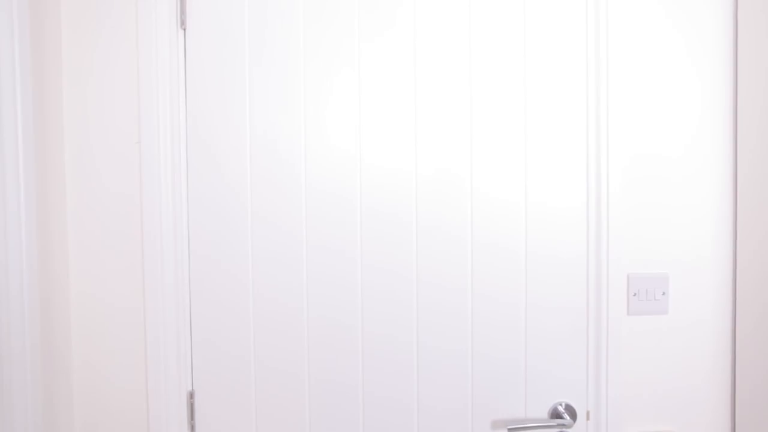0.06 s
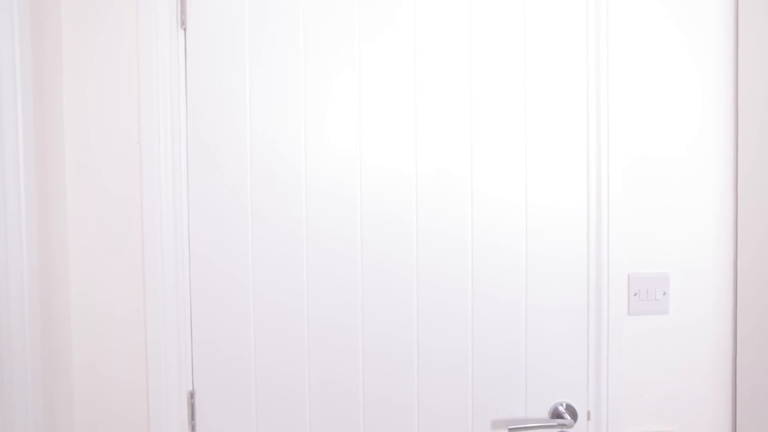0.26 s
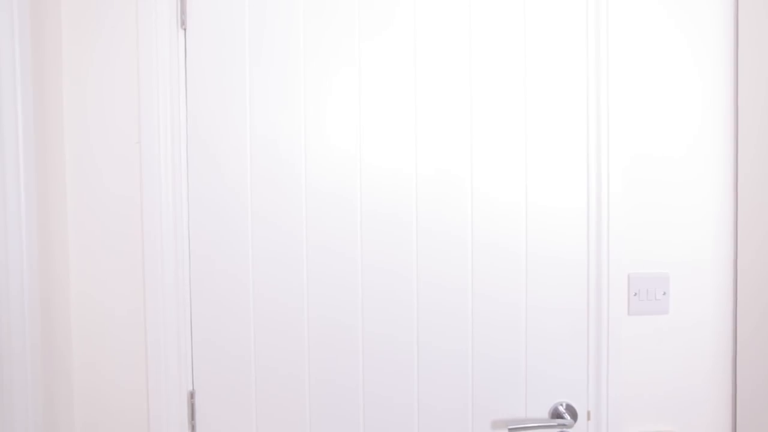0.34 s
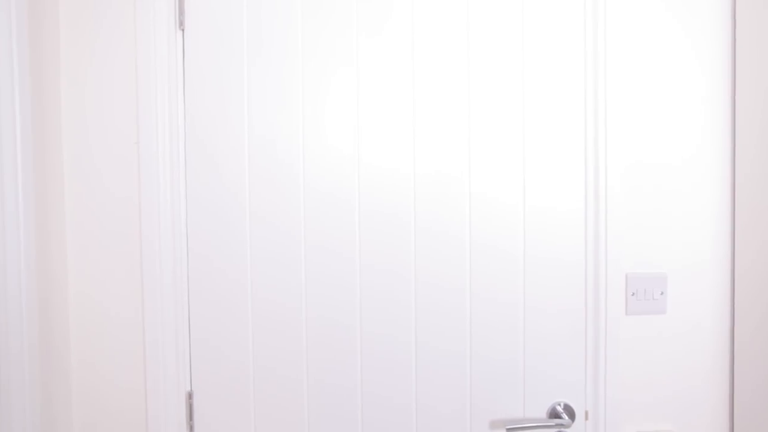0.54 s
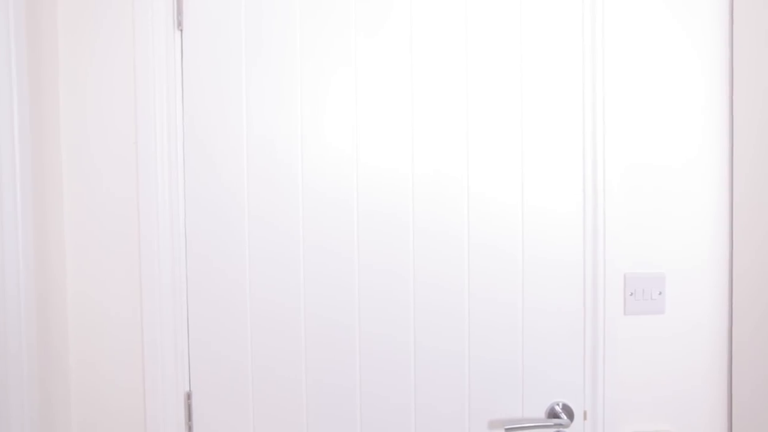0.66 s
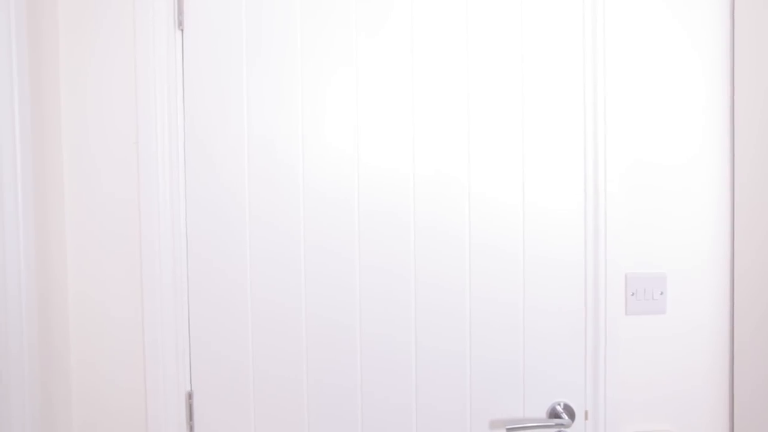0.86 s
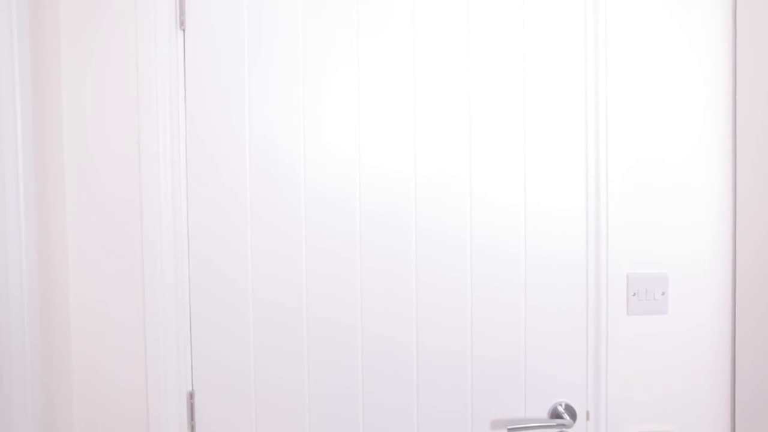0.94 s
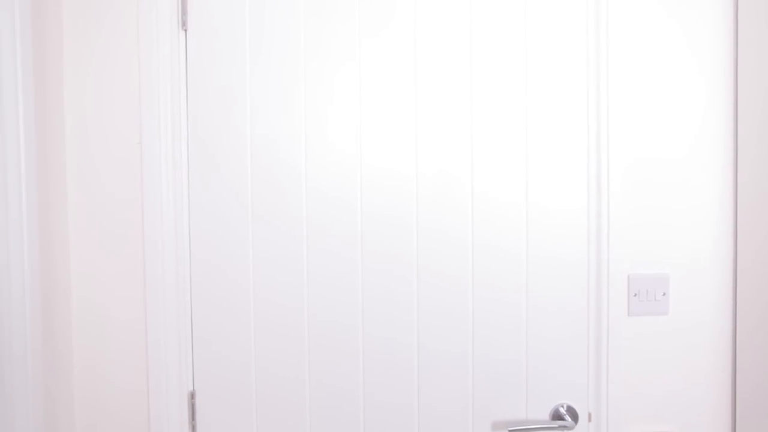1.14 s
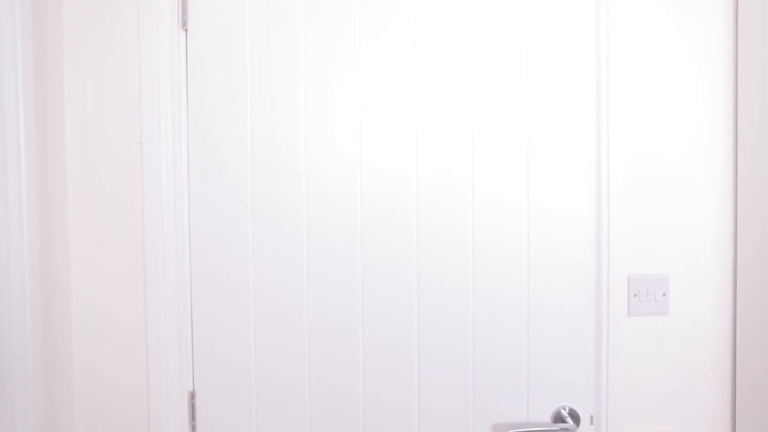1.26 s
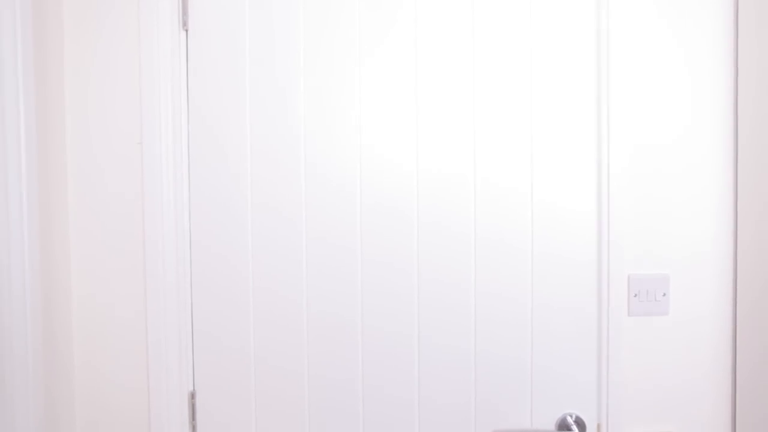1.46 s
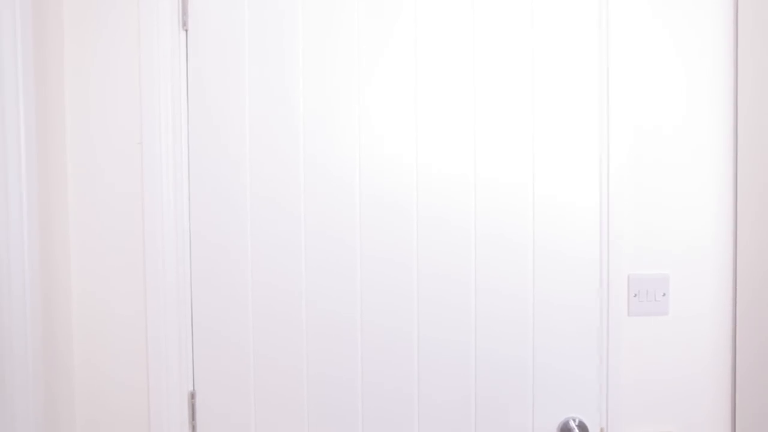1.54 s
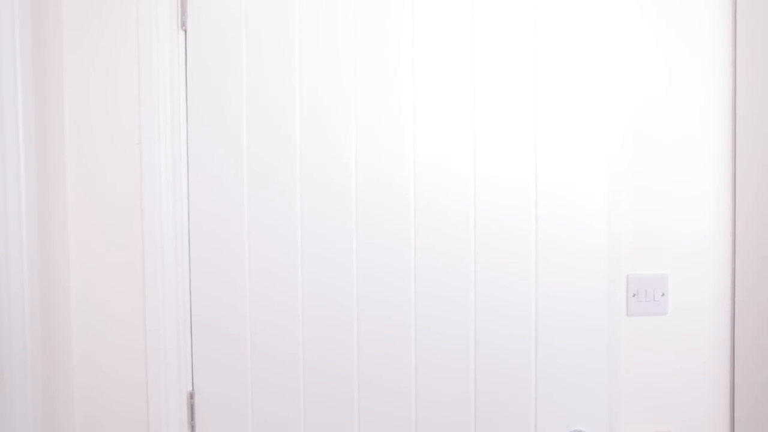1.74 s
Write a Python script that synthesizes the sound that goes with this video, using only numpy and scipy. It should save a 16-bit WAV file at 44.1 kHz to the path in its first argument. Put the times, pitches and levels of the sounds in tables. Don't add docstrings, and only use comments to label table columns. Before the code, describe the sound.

Someone raps three times on a wooden house door, the last hardest, then the handle clicks.

```python
import sys
import numpy as np
from scipy import signal
from scipy.fft import rfft, irfft
from scipy.io import wavfile
from scipy.ndimage import uniform_filter1d

SR = 44100
rng = np.random.default_rng(int(sys.argv[2]) if len(sys.argv) > 2 else 0)


def store_pcm(level_fs):
    pcm = np.round(np.clip(level_fs, -1, 1) * 32767).astype(np.int16)
    wavfile.write(sys.argv[1], SR, np.atleast_2d(pcm).T)


def gain_from_db(level_db):
    decades = np.asarray(level_db, float) / 20
    return 10 ** decades


N = 79380

# start_s, force_db, contact_ms, spot (0 = near the rail, 1 = mid panel)
KNOCKS = [
    (0.2231, -14.5, 1.386, 0.013),
    (0.3812, -14, 1.364, 0.087),
    (0.545, -9, 1.224, 0.79),
]
# pitch_hz, rail_db, mid_panel_db, t60_s, left_minus_right_db
LEAF = [(49.9, -10.5, -13, 0.82, -10.5), (53.7, -33.5, -27.5, 0.57, -9), (72.28, -10, -15.5, 0.86, 4.5),
        (84, -6.5, -14.5, 0.15, -10), (142.3, -15, -12.5, 0.19, 4.5), (179.1, -16, -18, 0.21, -13.5),
        (220.6, -32, -19.5, 0.33, 0.5)]
LEAF_SIGNS = [
    [1, 1, 1, 1, 1, 1, 1],
    [1, -1, 1, 1, 1, 1, 1],
]
# pitch_hz, rail_db, mid_panel_db, t60_s, left_minus_right_db
PANEL = [(310, -8.5, -21.5, 0.19, 4.5), (348.4, -7, -21.5, 0.09, 10), (406, -8, -22, 0.19, -5.5),
         (495.8, 0.5, -8, 0.082, 3), (534.6, 4.5, -4.5, 0.048, -8), (631.5, -4.5, -11.5, 0.16, 2.5),
         (613.6, -3.5, 0.7, 0.095, 1.8), (708, -18, 1, 0.024, -12.5), (889, -2.5, -7.5, 0.068, -6),
         (999, 0, -18, 0.05, -13), (1270, -22, -39.5, 0.055, -5.5), (626, -36.5, -28.5, 0.93, 3.5),
         (888, -35.5, -35, 0.7, 6), (756, -25, -26, 0.52, -5.5)]
PANEL_SIGNS = [
    [1, 1, 1, -1, 1, 1, 1, -1, 1, 1, 1, 1, 1, -1],
    [1, -1, 1, -1, 1, 1, 1, -1, 1, 1, 1, 1, -1, -1],
]
# pitch_hz, rail_db, mid_panel_db, t60_s, left_minus_right_db
CAVITY = [(350, -24.5, -31, .5, 1.5), (445, -28, -28.5, 0.45, -0.5), (493, -28, -27, 0.35, 4),
          (547.5, -33.5, -27, .35, -1), (622, -36.5, -28, 0.9, -8), (714, -42.5, -26, 0.72, -2),
          (729, -35.5, -26, .35, 0.5), (1021, -10, -22.5, 0.15, 0.5), (1116, -22, -31.5, .15, -2.5),
          (1214, -23.5, -25.5, .3, -2.5), (661, -44, -29.5, 0.57, -4), (828, -33, -20, 0.49, 7.5),
          (882, -31.5, -22, 0.38, 0), (385.6, -22.5, -32, .35, -0.5)]
# pitch_hz, level_db, t60_s
SKIN = [(1488, 3, 0.027), (1660, -14.5, 0.035), (1952, 0.5, 0.03), (1795, -5, 0.027), (2166, -9.5, 0.031),
        (2070, -4.5, 0.05), (2780, -15.5, 0.038), (3223, -12, 0.017), (3730, -17, 0.016),
        (2380, -13, 0.031), (1300, -3, 0.045), (1373, -11, 0.066), (1500, -13, 0.037)]
# start_s, level_db, pitch_share (of the lock modes), left_minus_right_db, crack_db
SLIPS = [
    (1.0979, -53, 2.7, -12, 0),
    (1.1022, -27, 1.5, -8, 1.5),
    (1.1046, -33, 1.704, -11.5, -5),
    (1.1078, -37.5, 1.9, -19.5, 5),
    (1.1154, -39.5, 1.4, 9, 5),
    (1.1236, -27.5, 1.13, 2, -2),
    (1.1242, -32.5, 1.52, 0, 8),
    (1.1274, -26, 1.45, 0.5, 5.5),
    (1.1312, -29.5, 0.753, -10, -5.5),
    (1.1357, -37, 3.1, -3, -5),
]
# pitch_hz, level_db, t60_s
LOCK = [(732, -1.5, .02), (1034, 3, 0.016), (1370, -4.5, 0.02), (1760, -17, 0.012), (2254, -11.5, .015),
        (2830, -23, 0.016), (3600, -10.5, 0.0059), (5130, -39, 0.0034), (8450, -11, 0.0036)]
# pitch_hz, level_db, t60_s
PLATE = (545, -13, 0.091)
# start_s, length_s, pitch_hz, level_db, left_minus_right_db
CASE_RINGS = [
    (1.1025, 0.0044, 1460, -30, -7),
    (1.1238, 0.0051, 999, -20, -1.5),
]
# start_s, level_db
RATTLES = [
    (.2255, -59),
    (.247, -66.5),
    (.259, -68.5),
    (.384, -67.5),
    (0.5447, -57),
    (.554, -62),
    (.568, -64.5),
    (.598, -65.5),
    (.601, -58.5),
]
# start_s, level_db, pitch_hz, t60_s
TAP = (1.711, -50, 1400, .014)
# start_s, level_db, pitch_hz, rise_s, t60_s
THUDS = [
    (1.142, -28, 67.2, 0.0041, 0.43),
    (1.176, -22, 62.2, 0.0033, 0.18),
    (1.237, -28, 64, 0.003, 0.297),
    (1.7925, -13.5, 37.8, 0.017, 0.17),
]
# start_s, pitch_hz, level_db
HINGE = [
    (1.45, 3300, -80),
    (1.462, 3300, -77),
    (1.48, 3223, -81.5),
    (1.505, 3400, -73),
    (1.525, 3500, -78),
    (1.568, 3390, -78),
    (1.614, 3860, -73.5),
    (1.722, 3970, -71),
    (1.79, 3600, -74),
]
# pitch_hz, level_db, start_s, length_s
OVERTONES = [
    (5350, -4, 1.61, .06),
    (4980, -1.5, 1.64, .05),
    (7800, -10, 1.62, .08),
    (2500, -3, 1.65, .04),
    (5250, -4, 1.71, .045),
]
# start_s, length_s, level_db
RUBS = [
    (0.216, 0.01, -59.5),
    (0.377, 0.0095, -59),
    (0.961, 0.076, -59),
    (1.027, 0.1, -63),
]
# pitch_hz, level_db (per Hz)
RUB = [(300, -18), (600, 1), (2400, -3.5), (7500, -11.5), (11000, -9.5), (13500, -19.5), (16000, -25.5)]
# pitch_hz, t60_s
HALL = [(50, 0.47), (250, 0.53), (660, 0.54), (1740, 0.45), (4590, 0.42), (12100, 0.23), (16000, 0.24)]
# pitch_hz, level_db (per Hz)
FLOOR = [(60, -2.5), (110, 2.5), (200, -1.5), (400, -7.5), (900, -11.5), (1800, -18), (4000, -25),
         (16000, -31)]
# pitch_hz, likeness
SAME = [(60, 0.98), (240, 0.6), (950, 0.25), (3770, 0.048), (15000, -0.017)]
# pitch_hz, level_db (per Hz)
RUMBLE = [(5, 0), (12, -3.5), (28, -6.5), (60, -20), (110, -28), (200, -81)]
# pitch_hz, likeness
RUMBLE_SAME = [(10, 0.55), (100, 0.35)]
# time_s, level_db
SWAY = [(0, -38.5), (.2, -46), (0.501, -36.5), (.85, -34.5), (1.052, -34), (1.3, -39), (1.55, -42),
        (1.8, -37)]


def evened(x):
    return x / np.sqrt(np.mean(x ** 2) + 1e-20)


def read(points, hz):
    f, value = np.transpose(points)
    return np.interp(np.log(hz + 1), np.log(f + 1), value)


def add(mix, start_s, sound):
    part = mix[..., round(start_s * SR):][..., :sound.shape[-1]]
    part += sound[..., :part.shape[-1]]


def lean(level_db, pan_db):
    return gain_from_db(level_db + np.array([[pan_db], [-pan_db]]) / 2)


def ring(hz, db, t60, t):
    return gain_from_db(db - 60 * t / t60) * np.cos(2 * np.pi * hz * t)


def noise(spectrum, same):
    hz = np.fft.rfftfreq(N, 1 / SR)
    a, b = rfft(rng.standard_normal((2, N)))
    likeness = np.clip(read(same, hz), -1, 1)
    right = likeness * a + np.sqrt(1 - likeness ** 2) * b
    return evened(irfft(np.array([a, right]) * gain_from_db(read(spectrum, hz)), N))


def knock(force_db, contact_ms, spot):
    t = np.arange(SR) / SR
    push = np.sin(np.pi * np.arange(0, 1, 1000 / SR / contact_ms)) ** 2
    door = signal.fftconvolve(wood(spot, t), push[None] / push.sum(), axes=1)[:, :SR]
    skin = np.zeros(SR)
    for hz, db, t60 in SKIN:
        detuned_hz = hz * rng.uniform(0.93, 1.02)
        skin += gain_from_db(db - 60 * t / t60) * np.sin(2 * np.pi * detuned_hz * t)
    skin *= np.minimum(t / 0.0025, 1)
    tick = np.diff(rng.standard_normal((2, SR + 1))) * np.exp(-t / 0.0059) * np.minimum(t / 0.0026, 1)
    skin_gain = gain_from_db(-23 + 4 * spot)
    tick_gain = gain_from_db(-49.5 - 7 * spot)
    return gain_from_db(force_db) * (door + skin_gain * skin + tick_gain * tick)


def wood(spot, t):
    cavity_signs = np.ones((2, len(CAVITY)))
    groups = [(LEAF, LEAF_SIGNS, 0.0002, 0), (PANEL, PANEL_SIGNS, 1 / SR, 0), (CAVITY, cavity_signs, 0.0072, 5.5)]
    out = np.zeros((2, len(t)))
    for modes, signs, rise_s, flutter_db in groups:
        for (hz, rail_db, mid_db, t60, pan_db), sign in zip(modes, np.transpose(signs)):
            beat = np.interp(t * 29.4, np.arange(100), rng.standard_normal(100))
            db = rail_db + (mid_db - rail_db) * spot + flutter_db * beat
            mode = ring(hz, db, t60, t) * (1 - np.exp(-t / rise_s))
            out += sign[:, None] * lean(0, pan_db) * mode
    return out


def latch():
    t = np.arange(SR // 2) / SR
    out = np.zeros((2, N))
    jolt = signal.fftconvolve(wood(0.78, t), np.hanning(90)[None] / 45, axes=1)[:, :len(t)]
    jolt = signal.sosfilt(signal.butter(2, 110, "high", fs=SR, output="sos"), jolt)
    for s, db, share, pan_db, crack_db in SLIPS:
        slip = ring(*PLATE, t) + crack(crack_db, t)
        for k, (hz, mode_db, t60) in enumerate(LOCK):
            slip += (-1) ** k * gain_from_db(mode_db - 60 * t / t60) * np.sin(2 * np.pi * hz * share * t)
        add(out, s, lean(db, pan_db) * slip + gain_from_db(db - 6) * jolt * rng.choice([-1, 1]))
    for s, length, hz, db, pan_db in CASE_RINGS:
        u = t[t < length]
        swell = np.sin(np.pi * (u / length) ** 1.67)
        add(out, s, lean(db, pan_db) * swell * np.sin(2 * np.pi * hz * u))
    for s, db in RATTLES:
        tick = signal.lfilter([1, 0, -1], [1], rng.standard_normal(len(t) + 1))[None, 1:]
        add(out, s, gain_from_db(db) * tick * np.exp(-t / 0.0022))
    s, db, hz, t60 = TAP
    add(out, s, ring(hz, db, t60, t)[None] * np.minimum(t / 0.0017, 1))
    return out


def crack(crack_db, t):
    same = 0.53
    left, other = signal.lfilter([1], [1, -0.79], rng.standard_normal((2, len(t))))
    burst = np.array([left, same * left + np.sqrt(1 - same ** 2) * other])
    return gain_from_db(-7.5 + crack_db) * burst * np.exp(-t / 0.004) * np.minimum(t / 0.00054, 1)


def thuds():
    t = np.arange(SR // 2) / SR
    out = np.zeros(N)
    for s, db, hz, rise, t60 in THUDS:
        add(out, s, gain_from_db(db - 60 * t / t60) * np.sin(2 * np.pi * hz * t) * (1 - np.exp(-t / rise)))
    return out


def hand():
    stroke = np.zeros(N)
    for s, length, db in RUBS:
        phase = np.arange(0, 1, 1 / SR / length)
        add(stroke, s, gain_from_db(db) * np.sin(np.pi * phase ** 0.55) ** 0.5)
    grain = gain_from_db(2.6 * evened(uniform_filter1d(rng.standard_normal(N), 200)))
    return stroke * grain * noise(RUB, SAME)


def hinge():
    t = np.arange(N) / SR
    s, hz, db = np.transpose(HINGE)
    waver = evened(uniform_filter1d(rng.standard_normal((len(OVERTONES) + 2, N)), 600))
    turn = 2 * np.pi * np.cumsum(np.interp(t, s, hz) + 15 * waver[0]) / SR
    tone = np.sin(turn) * np.clip(np.minimum(t - s[0], s[-1] - t) / 0.0097, 0, 1)
    for (side_hz, side_db, start, length), side_waver in zip(OVERTONES, waver[2:]):
        gate = abs(np.sin(np.pi * np.clip((t - start) / length, 0, 1))) ** 0.5
        side_turn = 2 * np.pi * np.cumsum(side_hz + 50 * side_waver) / SR
        tone = tone + gain_from_db(side_db) * gate * np.sin(side_turn)
    return tone * gain_from_db(np.interp(t, s, db) - 0.5 + 3.2 * waver[1])


def hall(x, reach=1):
    same = 0.61
    taps = np.zeros((2, SR))
    at = np.arange(200, SR - 20, 20) + rng.integers(0, 20, (2, (SR - 201) // 20))
    np.put_along_axis(taps, at, rng.choice([-1., 1.], at.shape), 1)
    taps[1] = same * taps[0] + np.sqrt(1 - same ** 2) * taps[1]
    hz, t, z = signal.stft(taps, SR, nperseg=512)
    z = z * gain_from_db(-60 * t / reach / read(HALL, hz)[:, None])
    z = z / np.linalg.norm(z[0], axis=1)[:, None]
    z = z * (hz > 100)[:, None]
    tail = signal.istft(z, SR, nperseg=512)[1]
    return signal.fftconvolve(x[None], tail / np.linalg.norm(tail[0]), axes=1)[:, :N]


def house():
    s, db = np.transpose(SWAY)
    sway = gain_from_db(np.interp(np.arange(N) / SR, s, db))
    return gain_from_db(-59.5) * noise(FLOOR, SAME) + sway * noise(RUMBLE, RUMBLE_SAME)


def scene():
    door = np.zeros((2, N))
    for s, *blow in KNOCKS:
        add(door, s, knock(*blow))
    lock = latch() + hand()
    door_wet = sum(hall(gain_from_db(-9.5) * side, reach=0.92) for side in door)
    turn = 2 * np.pi * 90 * np.arange(N) / SR
    lock_wet = sum(hall(gain_from_db(-10) * side * share) for share in (np.cos(turn), np.sin(turn)) for side in lock)
    return door + lock + thuds() + hinge() + door_wet + lock_wet + house()


def top_cut(x):
    return signal.sosfilt(signal.butter(12, 15950, fs=SR, output="sos"), x)


def record(dry):
    lowpass = signal.firwin(1023, 15850, window=("kaiser", 9), fs=SR)
    mix = signal.oaconvolve(dry, lowpass[None], "same")
    return top_cut(mix)


dry = scene()
out = record(dry)
store_pcm(out)
```